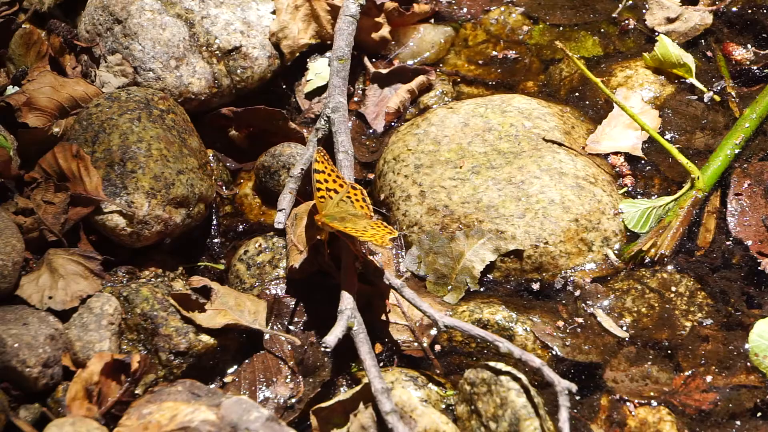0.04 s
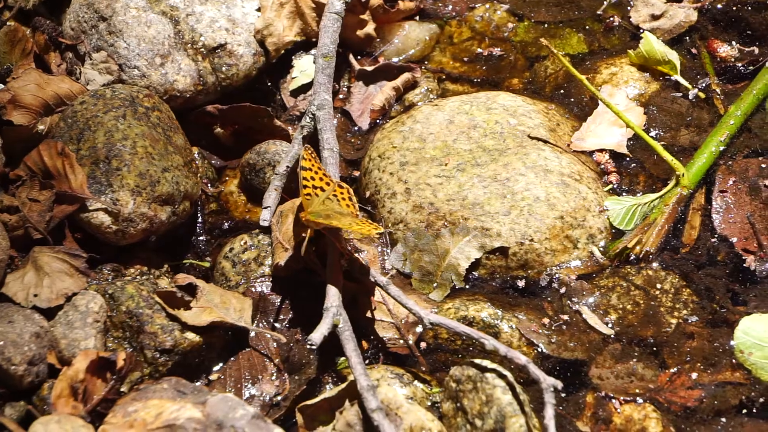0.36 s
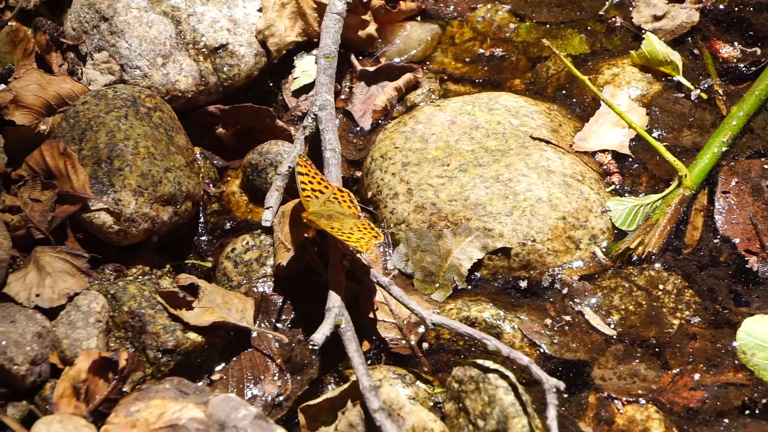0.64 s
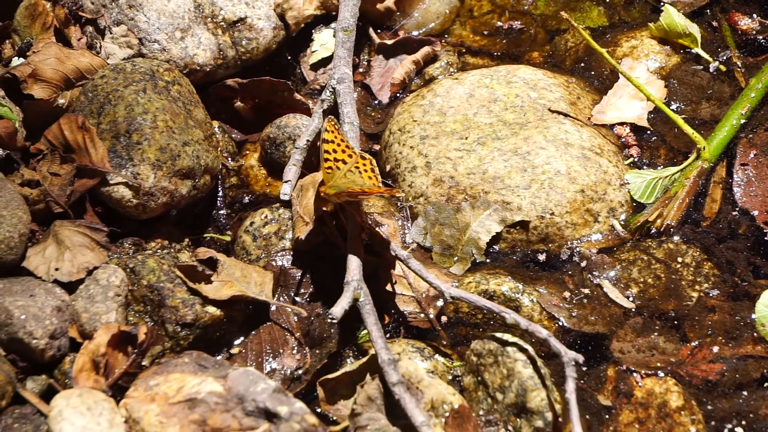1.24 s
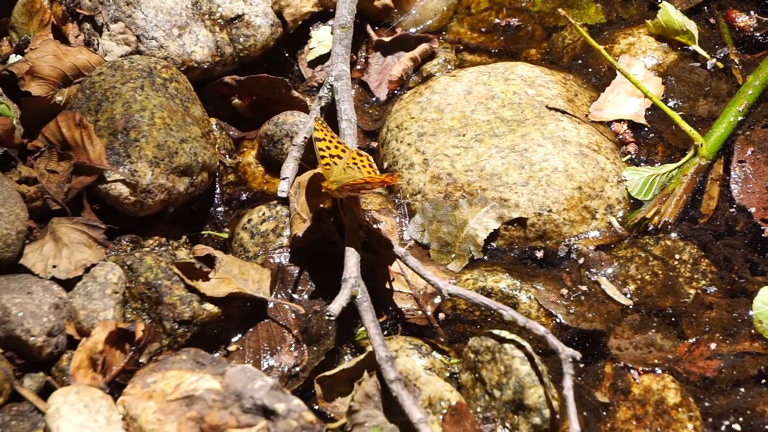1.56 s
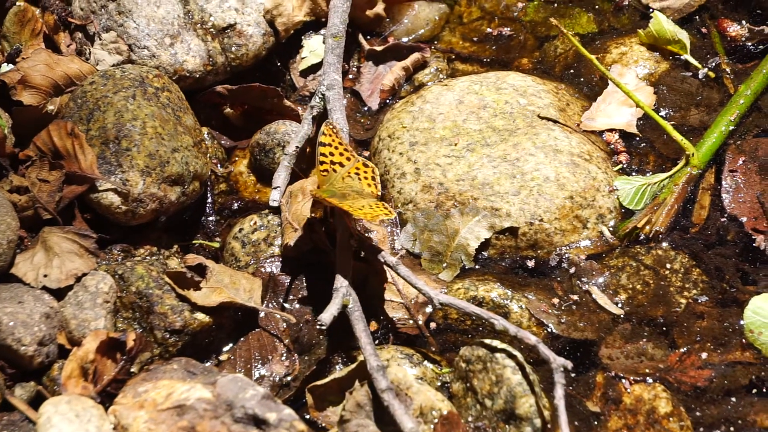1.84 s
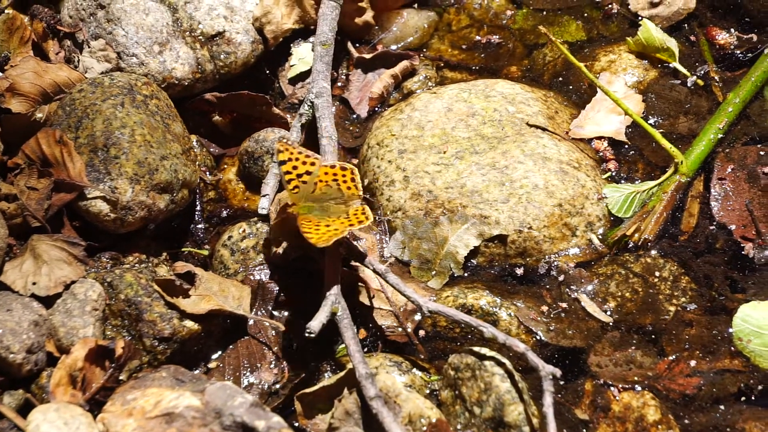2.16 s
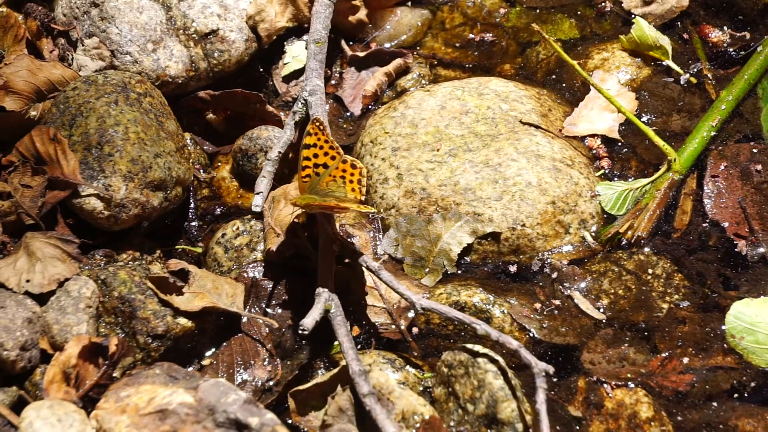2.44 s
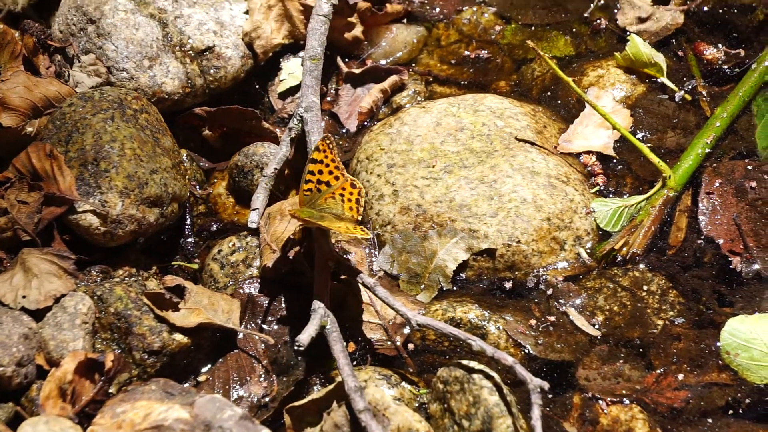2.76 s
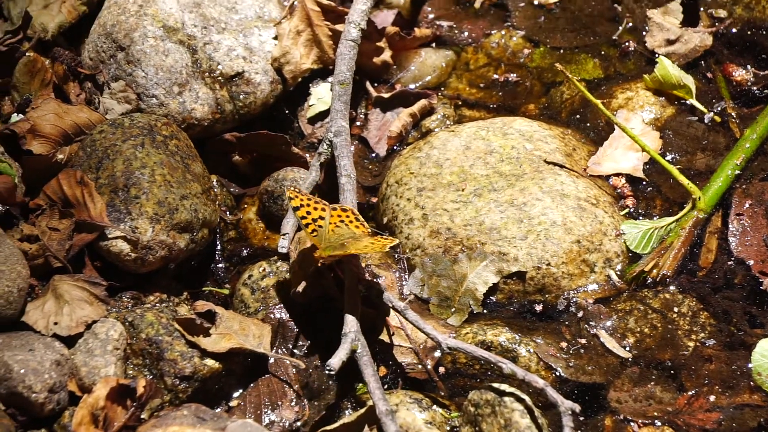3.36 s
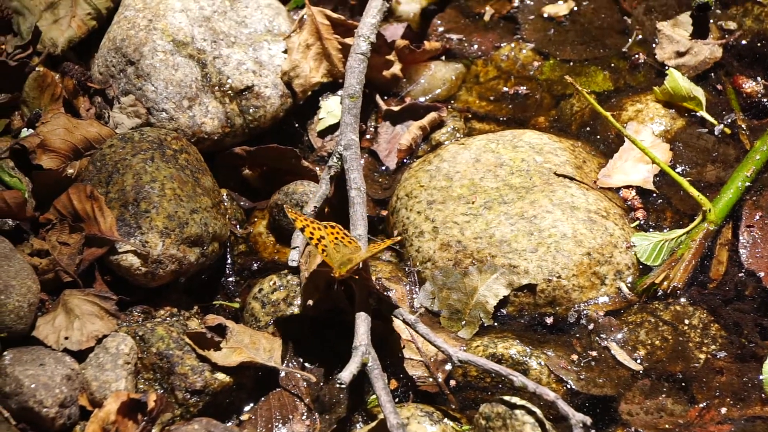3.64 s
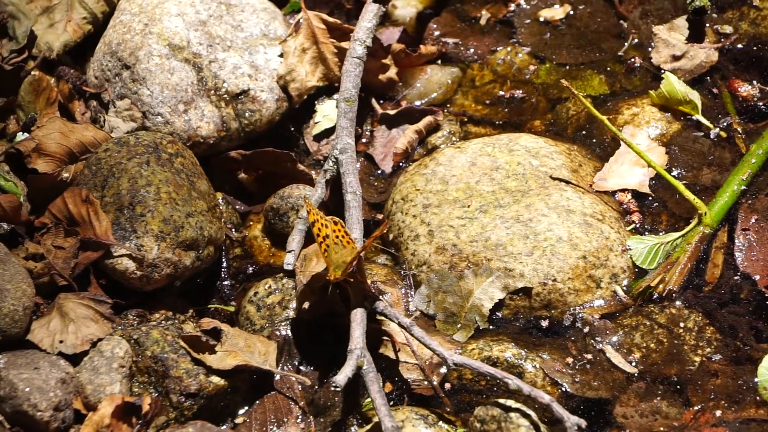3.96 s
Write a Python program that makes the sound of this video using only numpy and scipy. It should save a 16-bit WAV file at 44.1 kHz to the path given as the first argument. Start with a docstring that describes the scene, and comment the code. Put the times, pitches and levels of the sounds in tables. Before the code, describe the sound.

Shrill cicadas pulse about six times a second outdoors, the nearest slightly left of the microphone. A shallow stream runs steadily alongside with small gurgles and droplet ticks, and a far-off engine is barely audible.

```python
"""Cicadas fade in, chirping about six times a second: a near one on the left, brighter neighbours
just behind its beat, and a blurred chorus far off in the trees. Each chirp is a train of tymbal
clicks that rings a hollow abdomen. Beside them a shallow stony stream washes, gurgles and spits
as trapped air rings and droplets burst. A distant engine hums very faintly."""
import sys
import numpy as np
from scipy import signal
from scipy.fft import rfft, irfft, next_fast_len
from scipy.io import wavfile
from scipy.ndimage import uniform_filter1d, map_coordinates

SR = 44100
rng = np.random.default_rng(int(sys.argv[2]) if len(sys.argv) > 2 else 0)


def waveform_to_disk(signal):
    """Save audio, clipped to [-1, 1], as 16-bit WAV at the path in sys.argv[1]."""
    frames = np.transpose(np.atleast_2d(signal))
    scaled = np.clip(frames, -1, 1) * 32767
    samples = np.round(scaled).astype(np.int16)
    wavfile.write(sys.argv[1], SR, samples)


N = 176400

# chirps of the near cicada: centre t/s, relative level/dB
NEAR_CHIRPS = [(.2, 2.5), (.348, -1), (.504, -2), (.66, -4), (.8, -4), (.969, -2.5), (1.112, -2),
               (1.262, -3.5), (1.398, -3), (1.541, -2), (1.685, -0.7), (1.852, -1.5), (2.01, -4),
               (2.16, -2.5), (2.33, -1.5), (2.47, -3.5), (2.64, -2), (2.785, -2.5), (2.95, 0), (3.103, -3),
               (3.247, -4), (3.415, -3.5), (3.56, -2), (3.72, -2), (3.869, -1), (4.02, -0.5)]
# ribs that buckle in one tymbal stroke: typical delay t/s, relative level/dB
TYMBAL_RIBS = [(0, -9.5), (.0013, -7.5)]
# broad response of the abdomen: f/Hz, gain/dB
ABDOMEN_RESPONSE = [(100, -64), (600, -37), (1700, -32), (2300, -14), (3750, -24.5), (4100, -14),
                    (4400, -3), (4580, -2.5), (4780, -2.5), (4930, -7.5), (5150, -3), (5700, -21),
                    (6900, -22), (8200, -35), (11000, -36.5)]
# narrow shrill peaks near 4.5 kHz in the near cicada's song: f/Hz, half-width/Hz, boost/dB
NEAR_SONG_PEAKS = [(4485, 9.7, 4), (4617, 25, 6), (4660, 56, 3.5)]
def near_cicada():
    """Impulse excitation of a resonator: buckling tymbal ribs ring the hollow abdomen."""
    times, sizes = chirp_clicks(NEAR_CHIRPS, rate_hz=112.56, rise_s=0.072, fall_s=0.045,
                                jitter=.055, scatter_db=1, count=22)
    clicks = sum(impulses(times + delay * rng.lognormal(0, .4, times.shape), sizes * amp(db))
                 for delay, db in TYMBAL_RIBS)
    song = unit(resonate(clicks, ABDOMEN_RESPONSE, NEAR_SONG_PEAKS))
    echoes = amp(-1) * panned(tree_scatter(song), left_db=4.5)
    return amp(-23.5) * unit(panned(song, left_db=3) + echoes)


# chirps of the neighbours: centre t/s, relative level/dB
NEIGHBOUR_CHIRPS = [(.21, 7), (.364, 1.5), (.505, -1), (.657, -0.5), (.82, 1.5), (.98, 1), (1.137, 0),
                    (1.305, 1), (1.425, -1), (1.565, -0.5), (1.725, 0), (1.897, 1), (2.042, 1), (2.198, 0),
                    (2.345, -1), (2.5, 0), (2.646, -0.5), (2.815, -.5), (2.962, -1), (3.12, -1),
                    (3.278, 1.5), (3.425, 0), (3.587, 0), (3.745, 0.5), (3.892, 0)]
# broad response of their bodies: f/Hz, gain/dB
NEIGHBOUR_RESPONSE = [(100, -55), (600, -34.5), (1700, -19.5), (2400, -13.5), (3700, -18), (4200, -6.5),
                      (4650, -1), (4930, -5), (5200, -2), (5850, -10.5), (6850, -5.5), (7250, -13),
                      (7800, -9.5), (8150, -19.5), (9000, -14.5), (11000, -24)]
# narrow shrill peaks in their song: f/Hz, half-width/Hz, boost/dB
NEIGHBOUR_PEAKS = [(5590, 35, 4), (6950, 45, 5.5), (7530, 38, 6)]
def neighbours():
    """Reverberant field: from brighter cicadas further off, scattered sound outweighs direct sound."""
    times, sizes = chirp_clicks(NEIGHBOUR_CHIRPS, rate_hz=419.3, rise_s=0.072, fall_s=0.051,
                                jitter=.4, scatter_db=1.5, count=90)
    song = unit(resonate(impulses(times, sizes), NEIGHBOUR_RESPONSE, NEIGHBOUR_PEAKS))
    return amp(-24.5) * panned(unit(amp(-18.5) * song + tree_scatter(song)), left_db=-2.5)


def chirp_clicks(chirps, rate_hz, rise_s, fall_s, jitter, scatter_db, count):
    """Amplitude modulation: each chirp is an uneven pulse train that swells and dies away."""
    centre, db = np.transpose(chirps)[:, :, None]
    slip, drift, strength = rng.standard_normal((len(chirps), 3, count)).swapaxes(0, 1)
    offset = (np.arange(count) - count / 2 + jitter * (slip + np.cumsum(drift, axis=1) / 2)) / rate_hz
    swell = np.exp(-(offset / np.where(offset < 0, rise_s, fall_s)) ** 2)
    return centre + offset, swell * amp(db + scatter_db * strength)


# reverberation time among the trees: f/Hz, T60/s
TREE_DECAY = [(200, 0.098), (4500, 0.17), (11000, 0.038)]
def tree_scatter(x):
    """Diffuse echoes among the trees, rms 1; crossfaded tails keep them free of steady ringing pitches."""
    hz, t, noise = signal.stft(rng.standard_normal((8, 2, SR // 4)), SR, nperseg=256)
    tails = signal.istft(noise * amp(-60 * t / along(TREE_DECAY, hz)[:, None]), SR, nperseg=256)[1]
    active_tail = np.arange(N) // (SR // 8) % len(tails)
    echoes = np.zeros((2, N))
    for k, tail in enumerate(tails):
        crossfade = uniform_filter1d(1. * (active_tail == k), size=200)
        echoes += signal.oaconvolve((x * crossfade)[None], tail, axes=1)[:, :N]
    return unit(echoes)


# spectrum of the far cicadas: f/Hz, relative level/dB
CHORUS_SPECTRUM = [(200, -65), (1500, -28), (2600, -15), (3740, -16.5), (4150, -3), (4600, -3.5),
                   (5200, -8), (5800, -13.5), (6900, -12.5), (8000, -20), (11000, -26.5)]
def chorus():
    """Incoherent summation: many far cicadas blur into a steady shrill noise."""
    level_db = -23.5 + 0.28 * wobble(7.5) + 0.51 * wobble(230)
    return amp(level_db) * stereo_noise(CHORUS_SPECTRUM, coherence=[(4500, 0.06)], patchy_db=-2)


# spectrum of the running water: f/Hz, relative level/dB
WASH_SPECTRUM = [(25, -44), (55, -35), (85, -28), (112, -14), (155, -16.5), (230, -5.5), (320, -4.5),
                 (600, 0), (950, 2), (1400, -2), (2200, 1), (3400, -8.5), (6000, -26), (9000, -29),
                 (11000, -38)]
# likeness of its left and right channels: f/Hz, coherence/1
WASH_COHERENCE = [(100, 0.89), (300, 0.94), (600, 0.75), (1000, 0.66), (2000, 0.49), (4000, 0.063),
                  (10000, 0.039)]
def stream():
    """Broadband flow noise, with the ringing of small bubbles and a fine fizz."""
    wash = amp(-32 + 0.79 * wobble(5.21)) * stereo_noise(WASH_SPECTRUM, WASH_COHERENCE, patchy_db=1.3)
    babble = bubbles(centre_hz=677, spread=0.832, cycles=12.4, rise=0.084, size_db=4, count=700)
    fizz = bubbles(centre_hz=4600, spread=1, cycles=5.2, rise=0.14, size_db=4.5, count=2000)
    return panned(wash + amp(-44.5) * babble, left_db=.5) + amp(-40.5) * fizz


def bubbles(centre_hz, spread, cycles, rise, size_db, count):
    """Minnaert resonance: each bubble is a damped tone that rises as it nears the surface."""
    start = rng.uniform(0, N / SR, (count, 1))
    size, side = rng.standard_normal((2, count, 1))
    hz = centre_hz * np.exp(spread * rng.uniform(-1.015, 1, (count, 1)))
    t = np.arange(int(min(3 * cycles / centre_hz, .06) * SR)) / SR
    age = hz * t / cycles  # 1 after 40 dB of decay
    envelope = amp(size_db * np.clip(size, -2, 2) - 40 * age) * (1 - np.exp(-hz * t))
    tone = envelope * np.sin(2 * np.pi * hz * t * (1 + rise * age / 2))
    return unit(np.array([impulses(start + t, tone * amp(way * 3.6 * side)) for way in (1, -1)]))


# bubbles that stand out: onset t/s, f/Hz, peak level/dB
AIR_POCKETS = [(.602, 890, -23.5), (.638, 943, -25.5), (.684, 1140, -32), (.757, 359, -29),
               (.878, 896, -28.5), (0.927, 947, -23), (1.374, 855, -27), (1.442, 744, -29.5),
               (1.835, 410, -26), (2.069, 1205, -29), (2.34, 1010, -34), (2.918, 805, -29.5),
               (2.922, 386, -32.5), (3.203, 865, -36), (3.236, 1030, -36), (3.262, 538, -33),
               (3.29, 316, -33.5), (3.314, 876, -33), (3.378, 396, -30.5), (3.427, 606, -31),
               (3.452, 1026, -28), (3.598, 375, -32.5), (3.641, 886, -32), (3.657, 384, -30.5),
               (3.664, 1190, -30), (3.759, 3740, -19.5)]
def gurgles(attack_s=0.0054, rise_per_s=2.3):
    """Damped oscillation: air pockets ring between the stones, the smallest as short high drips."""
    start, hz, db = np.transpose(AIR_POCKETS)[:, :, None]
    t = np.arange(SR // 6) / SR
    t60 = 0.11 * 400 / hz  # 0.11 s at 400 Hz; smaller bubbles die sooner
    envelope = amp(-60 * t / t60) * (1 - np.exp(-t / attack_s))
    envelope /= envelope.max(axis=1, keepdims=True)
    tone = envelope * np.sin(2 * np.pi * hz * t * (1 + rise_per_s * t / 2))
    return impulses((np.round(start * SR) + .5) / SR + t, amp(db) * tone)


# small splashes: centre t/s, centre f/Hz, level/dB
WAVELETS = [(.806, 2180, -26), (1.11, 3000, -31), (2.44, 3450, -36)]
def splashes(width_s=0.0074, width_octaves=0.082):
    """Air entrainment: a breaking wavelet traps tiny bubbles of like size, a narrow-band puff."""
    t = np.arange(N) / SR
    out = np.zeros((2, N))
    for centre_s, centre_hz, db in WAVELETS:
        band = lambda hz: np.exp(-(np.log2((hz + 1) / centre_hz) / width_octaves) ** 2)
        puff = filtered(rng.standard_normal((2, N)), band)
        out += amp(db) * np.exp(-((t - centre_s) / width_s) ** 2) * unit(puff + puff.mean(axis=0))
    return out


# droplets that spit on stones: t/s, relative level/dB
DROPLETS = [(.578, -22), (.9595, -18), (1.063, -23), (1.2164, -17.5), (2.0556, -19), (2.315, -23),
            (2.318, -17.5), (2.4656, -17), (2.556, -21), (2.6048, -17), (2.607, -19), (2.68, -22),
            (3.3625, -18), (3.589, -21), (3.745, -17), (3.759, -17), (3.902, -13.5)]
# colour of a burst: f/Hz, gain/dB
DROPLET_RESPONSE = [(100, -60), (1500, -24), (5000, -13.5), (8500, 9.5), (11000, 7), (13000, -2.5)]
def spits(decay_s=0.0014, far_count=1500):
    """Brief transients have broad spectra: droplets burst brightly, and fainter ones crackle in clumps."""
    times, db = np.transpose(DROPLETS)[:, :, None]
    t = np.arange(SR // 100) / SR
    bursts = amp(db) * np.exp(-t / decay_s) * rng.standard_normal((len(DROPLETS), len(t)))
    near = resonate(impulses(times + t, bursts), DROPLET_RESPONSE)
    far = impulses(rng.uniform(0, N / SR, far_count), amp(9.1 * rng.uniform(-1.2, 1, far_count)))
    clumps = amp(5.8 * np.tanh(wobble(20)))
    return near + amp(-45.5) * unit(resonate(far * clumps, DROPLET_RESPONSE))


# hum of the distant engine: t/s, f/Hz, fundamental level/dB, octave level/dB
ENGINE_HUM = [(.4, 65.4, -69, -75), (1.3, 65.73, -72, -65), (2, 67, -71, -68), (2.3, 68.5, -73, -58.5),
              (3, 69.34, -74, -61), (3.3, 69.58, -60, -59), (3.6, 70.56, -66.5, -55), (3.8, 70.3, -73, -52),
              (4, 70, -80, -55)]
# upper orders that swell and fade as it moves: order/1, peak level/dB, peak t/s, width/s
UPPER_ORDERS = [(4.5, -49, 3.17, 1.2), (7, -47, 3.35, 1.6), (9, -46.5, 2.28, 0.73), (11, -52, 3.1, 1.5),
                (18, -49, 2.1, 1.4)]
def engine():
    """Orders are multiples of one rate: all climb as the engine gains speed; the air makes them flutter."""
    hz, fundamental_db, octave_db = curves(ENGINE_HUM)
    t = np.arange(N) / SR
    phase = 2 * np.pi * np.cumsum(hz * (1 + 0.003 * wobble(9))) / SR
    hum = amp(fundamental_db) * np.sin(phase) + amp(octave_db) * np.sin(2 * phase)
    hum *= amp(2.2 * wobble(5.91))
    whine = sum(amp(db + 3.2 * wobble(14)) * np.exp(-((t - peak_s) / width) ** 2) * np.sin(order * phase)
                for order, db, peak_s, width in UPPER_ORDERS)
    return np.sqrt(2) * (hum + whine)


def stereo_noise(spectrum, coherence, patchy_db):
    """Partial coherence: independent mid and side noises with patches of random gain, mixed to rms 1."""
    cells = signal.stft(rng.standard_normal((2, N)), nperseg=512)[2]
    patches = uniform_filter1d(rng.standard_normal(cells.shape[1:]), size=4, axis=0)
    patches = unit(uniform_filter1d(patches, size=8, axis=1))
    pair = signal.istft(cells * amp(patchy_db * patches), nperseg=512)[1][:, :N]
    def response(hz):
        angle = np.arccos(np.clip(along(coherence, hz), -1, 1)) / 2
        return amp(along(spectrum, hz)) * [np.cos(angle), np.sin(angle)]
    mid, side = filtered(pair, response)
    return unit(np.array([mid + side, mid - side]))


def resonate(x, colour, peaks=()):
    """Minimum-phase filtering: causal ringing with a broad colour and sharp peaks on top."""
    def response(hz):
        peaks_db = sum(boost / (1 + ((hz - f) / width) ** 2) for f, width, boost in peaks)
        cepstrum = irfft(np.log(amp(along(colour, hz) + peaks_db)))
        causal = np.arange(len(cepstrum)) < len(cepstrum) // 2
        return np.exp(rfft(2 * cepstrum * causal))
    return filtered(x, response)


def filtered(x, response):
    """Linear filtering: the spectrum of x times a frequency response."""
    size = 2 * next_fast_len(N // 2 + SR // 4)
    return irfft(rfft(x, size) * response(np.fft.rfftfreq(size, 1 / SR)), size)[..., :N]


def impulses(times, sizes):
    """Superposition of clicks of given sizes at given times."""
    return np.bincount(np.clip(times * SR, 0, N).astype(int).ravel(), np.ravel(sizes), N + 1)[:N]


def panned(x, left_db):
    """A level difference places a sound left or right."""
    return x * amp(np.array([[left_db], [-left_db]]) / 2)


def wobble(rate):
    """Smooth random modulation, rate knots a second."""
    return map_coordinates(rng.standard_normal(4096), [np.arange(N) * rate / SR], mode="mirror")


def along(points, hz):
    """Interpolation of (f/Hz, value) points on a log frequency axis."""
    f, values = np.transpose(points)
    return np.interp(np.log(hz + 1), np.log(f + 1), values)


def curves(rows):
    """Interpolation in time: one value per sample for each column after the first."""
    times, *columns = np.transpose(rows)
    return [np.interp(np.arange(N) / SR, times, column) for column in columns]


def amp(db):
    """Decibels to amplitude ratio."""
    return 10 ** (np.asarray(db) / 20)


def unit(x):
    """Normalisation to rms 1."""
    return x / np.sqrt(np.mean(x ** 2) + 1e-20)


def scene():
    """Superposition of insects, water and engine."""
    return near_cicada() + neighbours() + chorus() + stream() + gurgles() + splashes() + spits() + engine()


# opening fade, its last value held: t/s, gain/dB
FADE_IN = [(0, -100), (.075, -69), (.1, -44), (.155, -33.5), (.22, -28), (.28, -16), (.335, -7.5),
           (.45, -3)]
def record(dry):
    """A gain envelope fades the sound in, and a low-pass filter limits its band."""
    fade_db, = curves(FADE_IN)
    top_hz = 11090
    return filtered(dry * amp(fade_db), lambda hz: np.clip((top_hz - hz) / 100, 0, 1))


dry = scene()
out = record(dry)
waveform_to_disk(out)
```